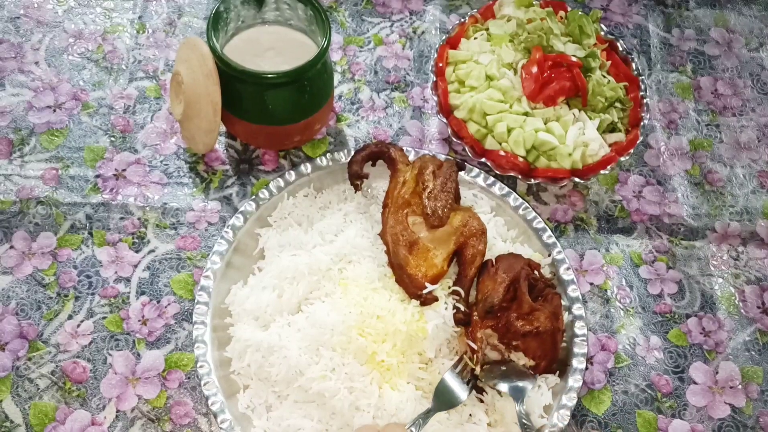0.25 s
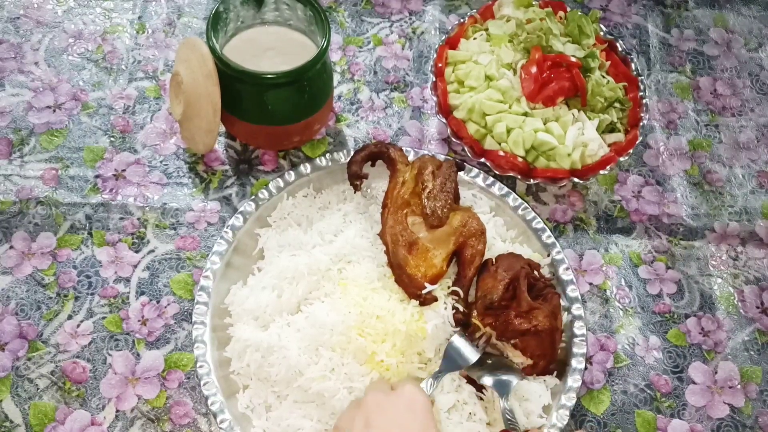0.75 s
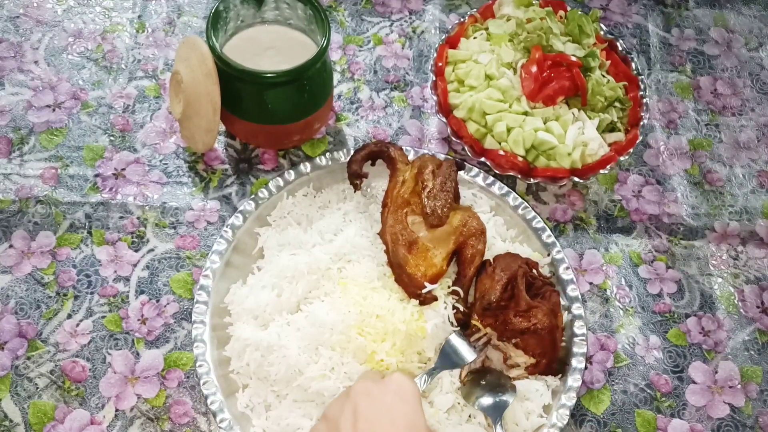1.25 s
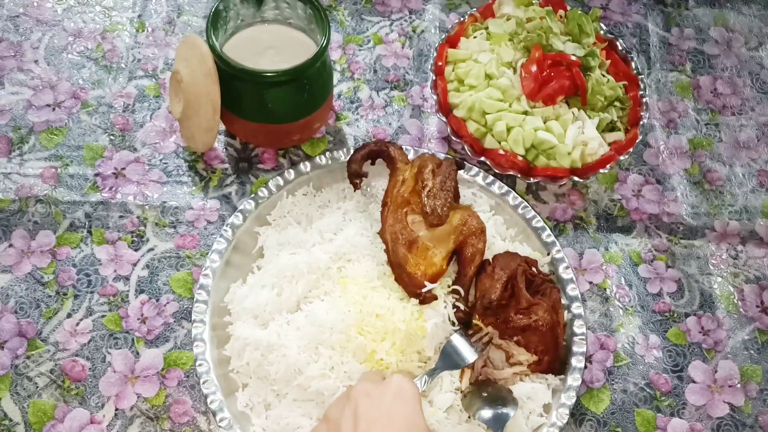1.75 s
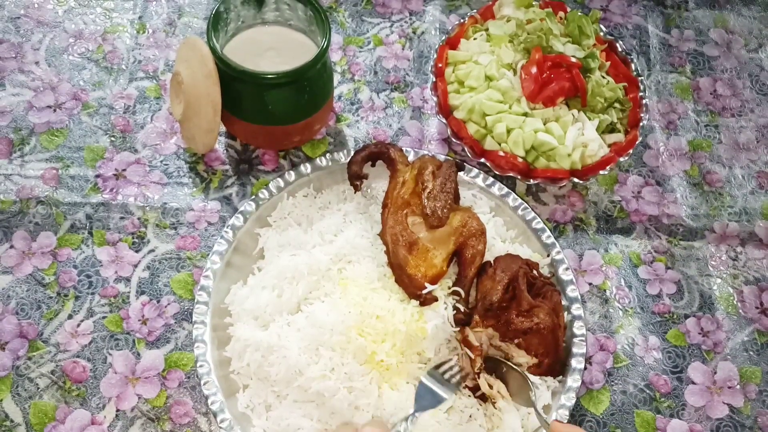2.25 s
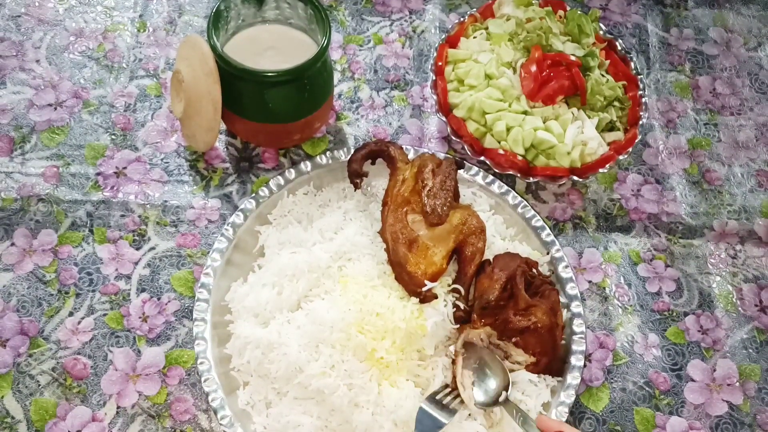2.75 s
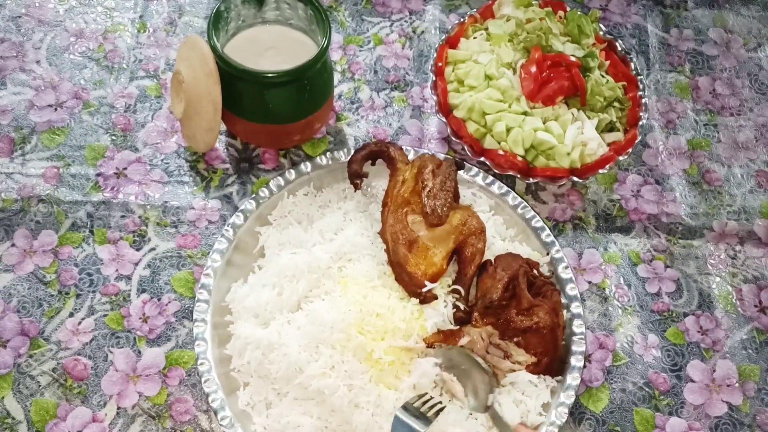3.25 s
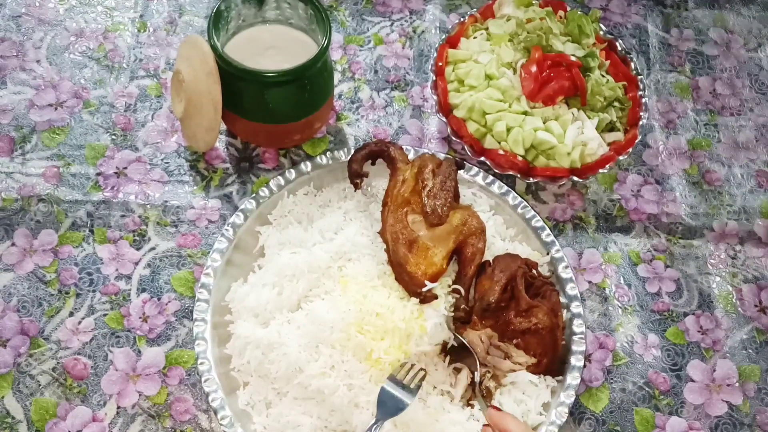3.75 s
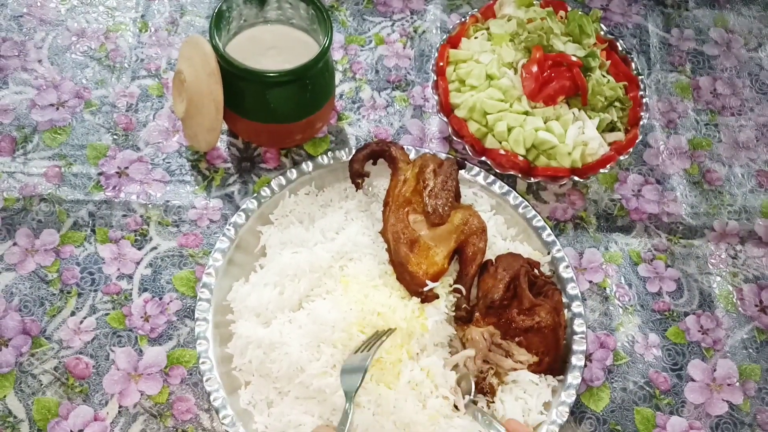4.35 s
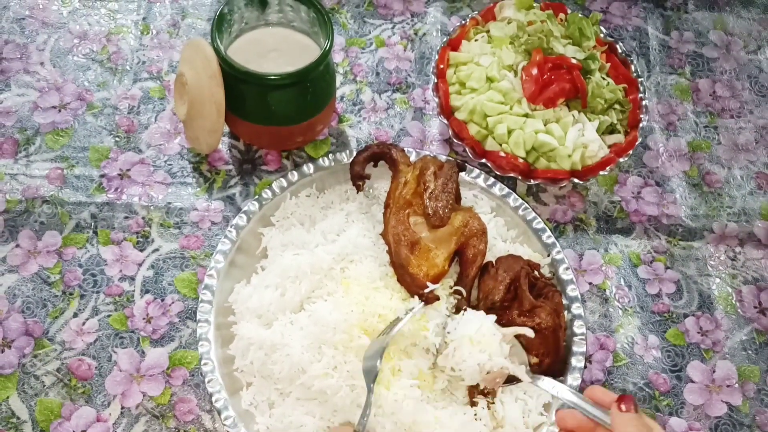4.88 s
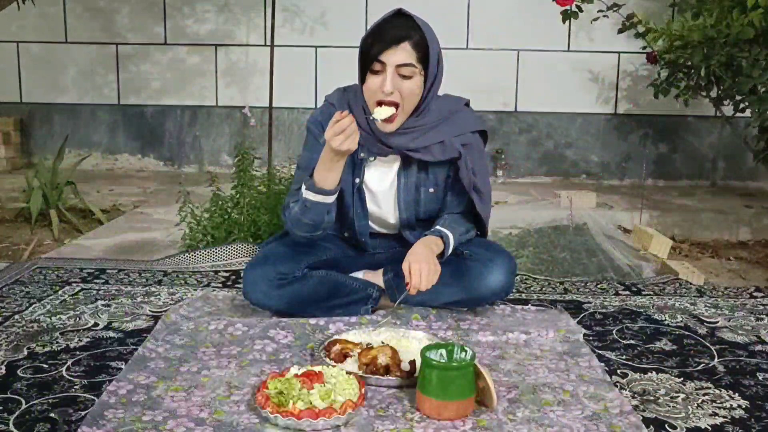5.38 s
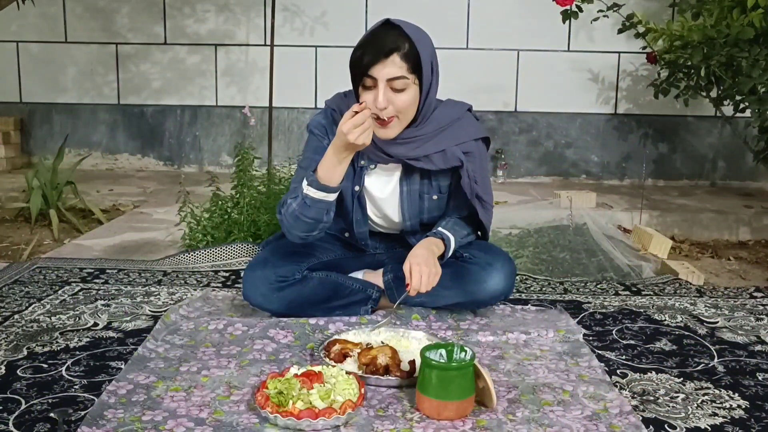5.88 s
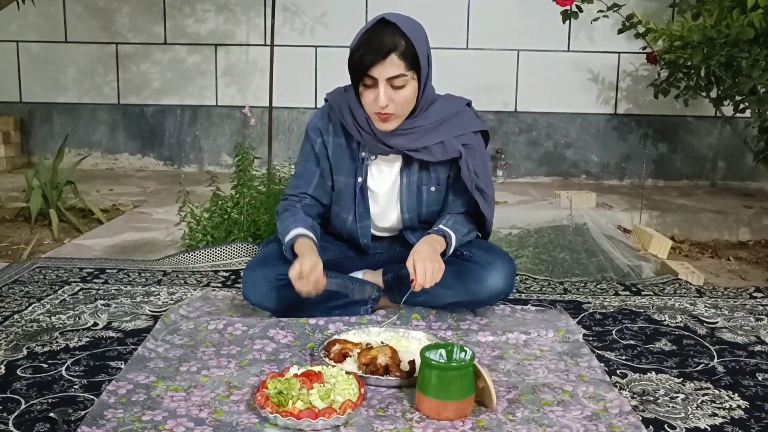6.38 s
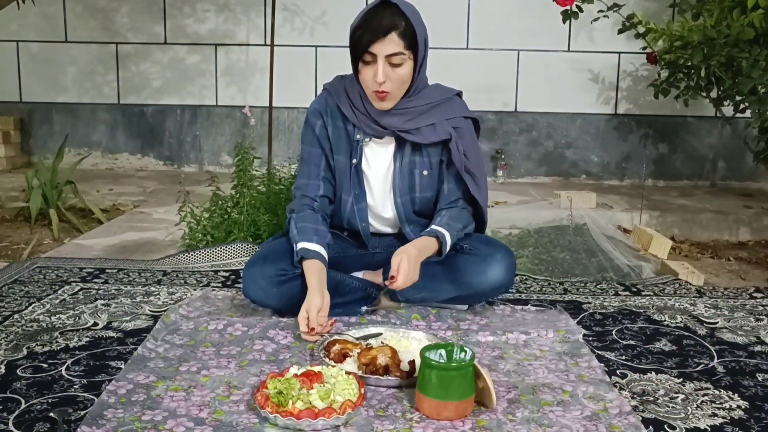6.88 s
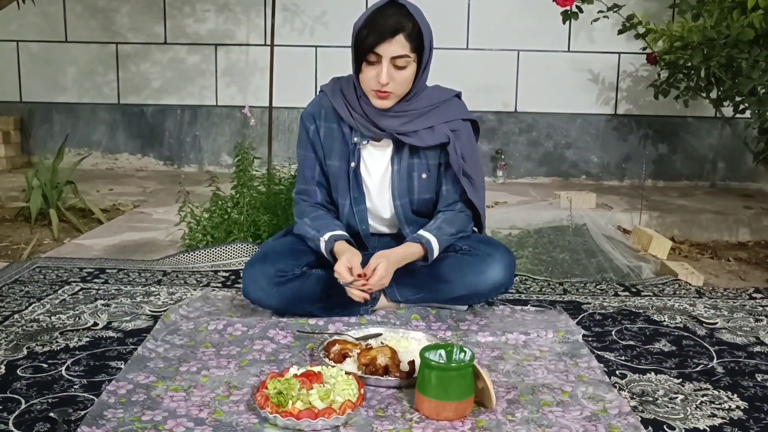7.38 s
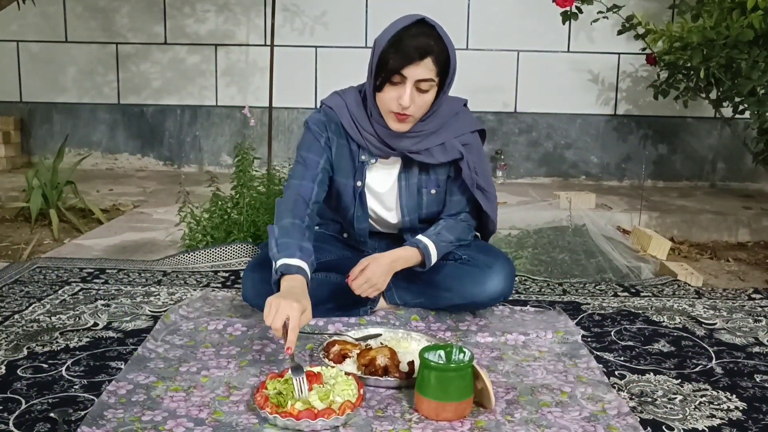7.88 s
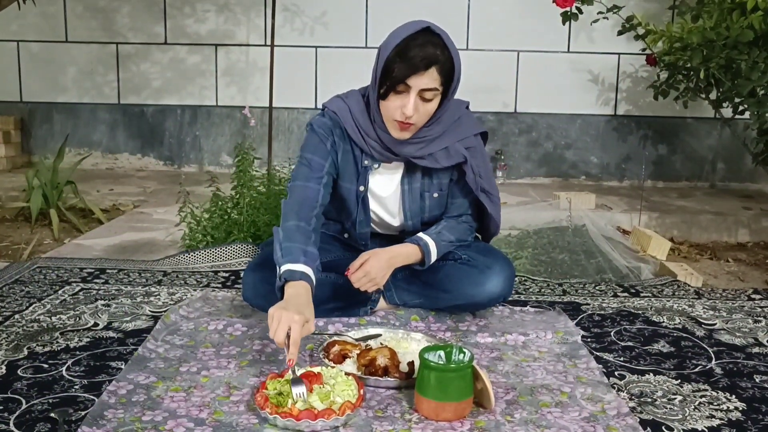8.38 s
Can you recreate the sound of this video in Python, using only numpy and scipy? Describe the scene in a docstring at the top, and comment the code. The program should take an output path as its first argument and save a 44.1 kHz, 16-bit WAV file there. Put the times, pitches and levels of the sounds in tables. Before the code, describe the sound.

In a quiet walled garden with a low hum of far traffic, light fork clicks and short spoon scrapes sound close by on a metal tray while a bird chirps in the distance. Halfway through, the microphone moves back from the meal and the bird calls much louder, in raspy falling notes with a short echo. The spoon clinks on the rim, then more chirps follow.

```python
"""A meal in a walled garden

Fork and spoon tick and scrape in a metal tray of rice and meat, then the spoon rattles onto the rim.
A bird gives harsh falling chirps, first far away, then close by, and the yard walls echo them.
The microphone starts just over the tray, where a faint cricket pulses, then stands back in the yard.
Distant traffic rumbles throughout."""
import sys
import numpy as np
from scipy import signal
from scipy.fft import rfft, irfft, next_fast_len
from scipy.io import wavfile
from scipy.ndimage import map_coordinates

SR = 44100
rng = np.random.default_rng(int(sys.argv[2]) if len(sys.argv) > 2 else 0)


def store_wav(level_fs):
    """Save 16-bit WAV to argv[1]."""
    pcm = np.round(np.clip(np.atleast_2d(level_fs), -1, 1) * 32767)
    wavfile.write(sys.argv[1], SR, pcm.T.astype(np.int16))


N = 380538
STEP_BACK_S = 5.08  # the microphone leaves the tray for the open yard


def amp(db):
    """Decibels to gain."""
    return 10 ** (np.asarray(db) / 20)


def unit(x):
    """Scale to rms 1."""
    return x / np.sqrt(np.mean(x ** 2) + 1e-20)


def struck(x):
    """Scale a hit so that its first 3 ms have rms 1."""
    return x / np.sqrt(np.mean(x[:, :SR * 3 // 1000] ** 2))


def along(points, hz):
    """Read a curve of (freq_hz, value) points on a log frequency axis."""
    freqs, values = np.transpose(points)
    return np.interp(np.log(hz + 1), np.log(freqs + 1), values)


def wobble(rate_hz, size):
    """Smooth random modulation, rate_hz knots a second."""
    knots = rng.standard_normal(int(size * rate_hz / SR) + 4)
    return map_coordinates(knots, [np.arange(size) * rate_hz / SR])


def filtered(x, response):
    """EQ a signal with a gain given as a function of frequency."""
    n = x.shape[-1]
    padded = next_fast_len(n + 4096)
    return irfft(rfft(x, padded) * response(np.fft.rfftfreq(padded, 1 / SR)), padded)[..., :n]


def tilt(hz, db_per_octave):
    """Tilt EQ pivoting at 4 kHz, flat below 500 Hz."""
    return amp(db_per_octave * np.log2(np.maximum(hz, 500) / 4000))


def body(modes, hz):
    """Response of a bank of resonances with alternating polarity."""
    return sum((-1) ** k * amp(db) * 1j * hz * width / (centre ** 2 - hz ** 2 + 1j * hz * width)
               for k, (centre, width, db) in enumerate(modes))


def add(track, start_s, sound):
    """Mix a sound into a track."""
    part = track[..., round(start_s * SR):][..., :sound.shape[-1]]
    part += sound[..., :part.shape[-1]]


def stepped_back():
    """Crossfade from 0 over the tray to 1 in the open yard, taking 0.1 s."""
    return np.clip((np.arange(N) / SR - STEP_BACK_S) * 10, 0, 1)


# Reverb time of the walled yard: freq_hz, t60_s
YARD_DECAY = [(300, 1), (3000, 0.65), (6000, 0.45), (12000, 0.51)]


def yard(x, wet_db, early_db, early_t60_s):
    """A short sound with its echoes: quick ones from ground and wall, then the yard's tail."""
    hz, t, noise = signal.stft(rng.standard_normal((2, SR * 2 // 3)), SR, nperseg=256)
    fade = amp(-60 * t / along(YARD_DECAY, hz)[:, None]) + amp(early_db - 60 * t / early_t60_s)
    impulse = signal.istft(noise * fade, SR, nperseg=256)[1]
    impulse *= amp(wet_db) / np.linalg.norm(impulse[0])
    impulse[:, 0] += 1  # direct sound
    return signal.fftconvolve(np.atleast_2d(x), impulse, axes=1) / np.hypot(1, amp(wet_db))


# Stereo image of the ambience: freq_hz, left_right_correlation
AMBIENCE_IMAGE = [(60, 0.88), (240, 0.63), (950, -0.031), (3770, -0.12), (15000, 0.034)]


def outdoors(spectrum):
    """A noise bed of rms 1, centred in the bass and wide in the treble."""
    def mid_side_eq(hz):
        angle = np.arccos(np.clip(along(AMBIENCE_IMAGE, hz), -1, 1)) / 2
        return amp(along(spectrum, hz)) * [np.cos(angle), np.sin(angle)]
    mid, side = filtered(rng.standard_normal((2, N)), mid_side_eq)
    return unit(np.array([mid + side, mid - side]))


# Fader ride of the traffic rumble, before its trim and swell: time_s, level_db
RUMBLE_RIDE = [(0.0, -60), (3.1, -61.5), (4.18, -64), (5.74, -60.5), (8.24, -62), (8.63, -59.5)]
# Low traffic rumble: freq_hz, gain_db
RUMBLE_EQ = [(20, -20), (35, -20), (58, 1.5), (105, -4), (135, 1), (210, -11), (450, -23), (1000, -62)]
# Tyres on the road: freq_hz, gain_db
TYRE_EQ = [(100, -20.5), (250, -0.5), (550, -4.5), (1000, -7.5), (2500, -17.5), (6000, -55)]
# Thin outdoor hiss: freq_hz, gain_db
AIR_EQ = [(290, -30), (500, -12), (707, -7), (771, -4), (1240, -22), (1350, -18), (1460, -14.5),
          (1970, -10), (4180, -10.5), (6000, -11), (7040, -20.5), (15800, -18.5)]


def traffic_and_air(trim_db=2, swell_db=1.25, tyres_close_db=-65.5, tyres_back_db=-62.5, air_db=-67.5):
    """Distant traffic swells under a steady hiss; more tyre noise reaches the open yard."""
    ride_db = np.interp(np.arange(N) / SR, *np.transpose(RUMBLE_RIDE))
    rumble = amp(ride_db + trim_db + swell_db * wobble(6, N)) * outdoors(RUMBLE_EQ)
    tyres = amp(tyres_close_db + (tyres_back_db - tyres_close_db) * stepped_back()) * outdoors(TYRE_EQ)
    return rumble + tyres + amp(air_db) * outdoors(AIR_EQ)


def cricket(pitch_hz=6200, level_db=-73.5, first_chirp_s=.115, first_rate_hz=7.58, last_rate_hz=4.85):
    """A distant cricket: a narrow, blurred tone pulsing ever slower, gone once the microphone moves."""
    progress = np.minimum(np.arange(N) / SR / STEP_BACK_S, 1)
    rate_hz = first_rate_hz + (last_rate_hz - first_rate_hz) * progress ** 3
    cycles = np.cumsum(rate_hz) / SR - first_rate_hz * first_chirp_s
    pulse = (.5 + .5 * np.cos(2 * np.pi * cycles)) ** 2.3
    tone = filtered(rng.standard_normal((2, N)), lambda hz: np.exp(-((hz - pitch_hz) / 280) ** 2))
    return amp(level_db) * (1 - stepped_back()) * pulse * unit(tone)


# Tone colour of the bird's throat: freq_hz, gain_db
THROAT_EQ = [(800, -32), (1150, -14), (1550, -11), (2100, -4), (2800, -3.5), (3650, 3), (4080, -1),
             (4800, 1), (5900, -10.5), (6500, -8.5), (8400, -27.5), (10800, -27), (12400, -31),
             (13800, -52)]


def throat(voice, muffle_db, tilt_db_per_octave, formant_hz, formant_db=5.5, width_octaves=.3):
    """The throat colours the voice with a squawking formant; a shelf at 5 kHz muffles the treble."""
    def response(hz):
        shelf_db = muffle_db / (1 + (5000 / (hz + 1)) ** 3)
        squawk_db = formant_db * np.exp(-(np.log2((hz + 1) / formant_hz) / width_octaves) ** 2)
        return amp(along(THROAT_EQ, hz) - shelf_db + squawk_db) * tilt(hz, tilt_db_per_octave)
    return filtered(voice, response)


# Bird calls: start_s, length_s, level_db is last and start_pitch_hz third
BIRD_CALLS = [(0.236, .08, 1854, -64.5), (0.746, 0.067, 1668, -59.5), (1.144, 0.075, 1800, -64.5),
              (1.92, 0.081, 1660, -58.5), (2.164, 0.065, 1678, -60), (2.518, 0.098, 1800, -64),
              (4.014, 0.1, 1755, -60), (4.139, 0.073, 1890, -59.5), (5.077, 0.11, 1495, -50.5),
              (5.193, 0.11, 1791, -38), (5.366, .105, 1785, -36), (7.205, .08, 1745, -42.5),
              (7.35, .11, 1773, -35.5), (7.595, 0.039, 1692, -49.5), (7.655, 0.041, 1648, -48.5),
              (7.745, 0.052, 1611, -49), (8.138, 0.095, 1681, -39), (8.356, 0.097, 1756, -36.5)]


def bird(fall=.3, jitter=.055, rasp_mix=.85, flutter_db=2, beak_opens_s=.035, left_lag_s=.00025):
    """Each call is a rasping harmonic stack that holds, then falls in pitch and grows duller."""
    out = np.zeros((2, N))
    for start_s, length_s, pitch_hz, level_db in BIRD_CALLS:
        n = int(length_s * SR)
        progress = np.arange(n) / n
        pitch = pitch_hz * (1 - fall * progress ** 2.2) * (1 + jitter * wobble(900, n))
        phase = 2 * np.pi * np.cumsum(pitch) / SR
        stack = unit(sum(np.sin(k * phase) for k in range(1, 8)))
        rasp = unit(rng.standard_normal(n) * (1 + np.cos(phase)))  # turbulence, once a cycle
        voice = stack + rasp_mix * rasp
        muffle_db = max(0, -53 - level_db)  # faint, far calls lose treble
        bright = throat(voice, muffle_db, tilt_db_per_octave=6, formant_hz=5600)
        dull = throat(voice, muffle_db, tilt_db_per_octave=-3, formant_hz=2860)
        beak = np.minimum(1, .29 + progress * length_s / beak_opens_s)
        swell = beak * np.sin(np.pi * progress) ** .19 * amp(flutter_db * wobble(300, n))
        call = unit(((1 - progress) * bright + progress * dull) * swell)
        add(out, start_s, yard(amp(level_db) * call, wet_db=6.5, early_db=-4, early_t60_s=.042))
    # The bird sits to the right, so the left channel hears it later.
    return filtered(out, lambda hz: np.exp(np.pi * left_lag_s * np.outer([-1j, 1j], hz)))


def rubbing(strokes, spectrum, slips_per_s, wet_db):
    """Tiny irregular slips of metal on metal shake a damped body."""
    out = np.zeros((2, N))
    for start_s, length_s, level_db, slope in strokes:
        n = int(length_s * SR)
        slipping = rng.random(n) < slips_per_s / SR
        slips = slipping * (.74 * rng.standard_normal(n) + rng.standard_normal((2, n)))  # centre + wide
        rub = unit(filtered(slips, lambda hz: amp(along(spectrum, hz)) * tilt(hz, slope)))
        swell = np.sin(np.pi * (np.arange(n) / n) ** .58)
        add(out, start_s, yard(amp(level_db) * rub * swell, wet_db, early_db=12, early_t60_s=.13))
    return out


# Light fork strokes: start_s, length_s, level_db, tilt_db_per_octave
FORK_GRAZES = [(1.652, .025, -59.5, -4.5), (2.94, 0.029, -60.5, 0), (3.049, .014, -53, 1.5),
               (3.132, 0.011, -55.5, -8), (3.146, 0.011, -51, 0.5), (3.322, .03, -61, -2)]
# Resonances of the tines as they skim the tray: freq_hz, gain_db
TINES_ON_TRAY_EQ = [(1500, -25), (2300, -6.5), (2750, 2), (3200, -1), (3700, -2), (4700, -5), (5750, 2),
                    (6600, -10), (7750, -6), (8500, -19), (11300, -6), (12500, -14), (15500, -13)]


def fork_grazes():
    """The tines skim the tray in short, bright scratches."""
    return rubbing(FORK_GRAZES, TINES_ON_TRAY_EQ, slips_per_s=5300, wet_db=-1)


# Sharp fork touches, damped by food: start_s, level_db, tray_mix_db, left_minus_right_db
FORK_TICKS = [(1.799, -47, -18, 3), (1.8206, -42, -22, -3), (1.8246, -34.5, -12, 2), (1.8384, -48, -17, -2),
              (1.9513, -55.5, -8, -1), (2.7948, -53, 6, 4), (2.8455, -45.5, 0, 1), (5.371, -49, -12, 0),
              (5.704, -40, 1, 0), (5.837, -56.5, 7, 3), (8.502, -49, 3, 0)]
# Resonances of the tines: freq_hz, bandwidth_hz, gain_db
FORK_MODES = [(4050, 730, -12), (5740, 460, 0), (7530, 330, 1), (8920, 440, -2), (10030, 620, -11),
              (12300, 250, 1.5), (13300, 700, -18), (15200, 500, -9)]


def fork_ticks(contact_t60_s=.013, wet_close_db=-13, wet_back_db=-1):
    """A brief chatter of contact rings the tines; the tray under the food answers shortly."""
    out, t = np.zeros((2, N)), np.arange(SR // 16) / SR
    for start_s, level_db, tray_mix_db, pan_db in FORK_TICKS:
        contact = rng.standard_normal((2, len(t))) * amp(-60 * t / contact_t60_s)
        tines = struck(filtered(contact, lambda hz: body(FORK_MODES, hz)))
        tray = struck(filtered(contact, lambda hz: amp(along(TINES_ON_TRAY_EQ, hz))))
        pan = amp([[pan_db / 2], [-pan_db / 2]])
        tick = amp(level_db) * (tines + amp(tray_mix_db) * tray) * pan
        wet_db = wet_close_db if start_s < STEP_BACK_S else wet_back_db
        add(out, start_s, yard(tick, wet_db, early_db=4, early_t60_s=.034))
    return out


# Meat tears after a stab of the fork: peak_s, level_db
MEAT_TEARS = [(1.87, -69.5), (2.88, -74)]


def food(pops_per_s=260, centre_hz=8500, rise_s=.036, fade_s=.2, stir_db=-82.5):
    """Tearing meat and stirred sticky rice part in tiny crackles, heard only from close by."""
    t = np.arange(N) / SR
    tearing = sum(amp(level_db) * np.exp(np.minimum((t - peak_s) / rise_s, (peak_s - t) / fade_s))
                  for peak_s, level_db in MEAT_TEARS)
    pops = (rng.random(N) < pops_per_s / SR) * rng.exponential(size=N)
    pop_decay = np.linspace(1, 0, SR // 250) ** 2  # 4 ms
    bursts = signal.fftconvolve(pops, pop_decay)[:N] * rng.standard_normal((2, N))
    crackle = unit(filtered(bursts, lambda hz: np.exp(-(np.log2((hz + 1) / centre_hz) / 1.14) ** 2)))
    return (tearing + amp(stir_db)) * (1 - stepped_back()) * crackle


# Spoon strokes: start_s, length_s, level_db, tilt_db_per_octave
SPOON_SCRAPES = [(2.803, 0.059, -47, 3.5), (3.875, 0.051, -42.5, -1.5), (3.976, .038, -44, -1.5),
                 (4.884, .007, -57.5, -11), (4.985, 0.0049, -58, 0)]
# Bottom of the loaded tray: freq_hz, gain_db
TRAY_BOTTOM_EQ = [(120, -22), (280, -10.5), (700, -7.5), (830, -4.5), (1050, 0), (1500, -4), (1720, -11.5),
                  (1960, -6), (2240, -16), (2600, -5.5), (2820, -14), (3050, -3), (3700, -11), (6000, -14),
                  (11000, -25.5), (15000, -28)]


def spoon_scrapes():
    """The spoon drags over the loaded tray's bottom with a midrange rasp."""
    return rubbing(SPOON_SCRAPES, TRAY_BOTTOM_EQ, slips_per_s=6000, wet_db=-4)


# Partials of the knocked tray and spoon: freq_hz, gain_db, t60_s
KNOCK_MODES = [(139, -19, 0.22), (740, -2, 0.019), (975, -0.5, 0.02), (1900, -3.5, 0.019),
               (3870, -7.5, 0.022), (13600, -20, .08)]


def tray_knock(start_s=2.827, gain_db=-33):
    """The spoon breaks through the meat and knocks the tray on the ground; rice and cloth damp it."""
    out, t = np.zeros((2, N)), np.arange(SR // 8) / SR
    thud = sum(amp(db - 60 * t / t60_s) * np.sin(2 * np.pi * hz * t) for hz, db, t60_s in KNOCK_MODES)
    add(out, start_s, yard(amp(gain_db) * thud, wet_db=-9.5, early_db=6, early_t60_s=.07))
    return out


# Spoon hits on the rim: start_s, level_db, tilt_db_per_octave, ring_mix_db, loss_per_bounce_db
RIM_CLINKS = [(6.155, -40.5, -4.5, -10, 1.5), (6.326, -49.5, 4, -11.5, 1), (6.899, -31, -1, 4, 5.5)]
# Resonances of the thin tray: freq_hz, bandwidth_hz, gain_db
RIM_MODES = [(550, 57, -11), (1080, 59, -13), (1576, 46, -16), (2510, 45, 4), (3300, 71, 0), (3650, 59, -1),
             (4040, 57, -1), (4510, 80, 0), (5270, 86, -1.5), (6610, 39, 0), (7750, 150, -9.5),
             (8500, 130, -9.5), (9250, 170, -14), (10080, 150, -9.5), (11030, 280, -13), (12000, 160, -17),
             (13000, 140, -17)]
# Contact noise of spoon on rim: freq_hz, gain_db
CRACK_EQ = [(180, -61), (300, -27), (553, -37), (708, -28.5), (2210, -6), (2520, -4), (5300, -5),
            (6680, -11), (7020, -19), (7500, -16), (11100, -22), (13600, -27), (15500, -46)]


def spoon_clinks(crack_t60_s=.051, contacts=4, first_gap_s=.009, gap_growth=1.5):
    """The spoon rattles on the bare rim; each lighter contact is a crack and a short metal ring."""
    out, t = np.zeros((2, N)), np.arange(SR // 4) / SR
    for start_s, level_db, slope, ring_mix_db, loss_db in RIM_CLINKS:
        for bounce in range(contacts):
            delay_s = sum(first_gap_s * gap_growth ** j for j in range(bounce))
            brightness = lambda hz: tilt(hz, slope + .2 * bounce)  # lighter contacts are brighter
            contact = rng.standard_normal((2, len(t))) * amp(-60 * t / crack_t60_s)
            crack = struck(filtered(contact, lambda hz: amp(along(CRACK_EQ, hz)) * brightness(hz)))
            blow = (t == 0) + .027 * contact
            ring = struck(filtered(blow, lambda hz: body(RIM_MODES, hz) * brightness(hz)))
            clink = amp(level_db - bounce * loss_db) * (crack + amp(ring_mix_db) * ring)
            add(out, start_s + delay_s, yard(clink, wet_db=2, early_db=-3.5, early_t60_s=.13))
    return out


# Colour mismatch of the two microphone ports: freq_hz, left_minus_right_db
PORT_BALANCE = [(1000, -0.5), (1800, -2.5), (2900, -6), (3700, 1.5), (5000, 2), (5900, 11), (7200, -8.5),
                (8400, -6), (9200, 16.5), (11000, 8), (12500, -6), (15000, -8)]


def scene():
    """Bird and meal, coloured differently by each microphone port, over the cricket and the traffic."""
    rubs = spoon_scrapes() + fork_grazes()
    foreground = bird() + fork_ticks() + tray_knock() + spoon_clinks() + rubs + food()
    at_ports = filtered(foreground, lambda hz: amp(np.outer([.5, -.5], along(PORT_BALANCE, hz))))
    return at_ports + cricket() + traffic_and_air()


def record(dry, cutoff_hz=15900):
    """A brick-wall low-pass at the recorder's band limit."""
    return filtered(dry, lambda hz: hz < cutoff_hz)


dry = scene()
out = record(dry)
store_wav(out)
```